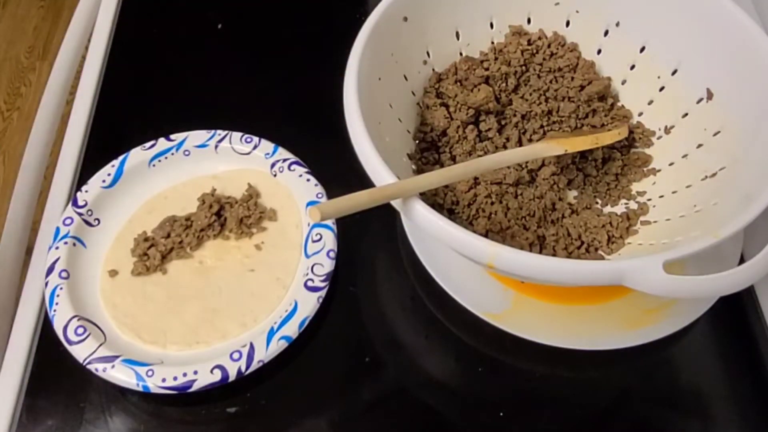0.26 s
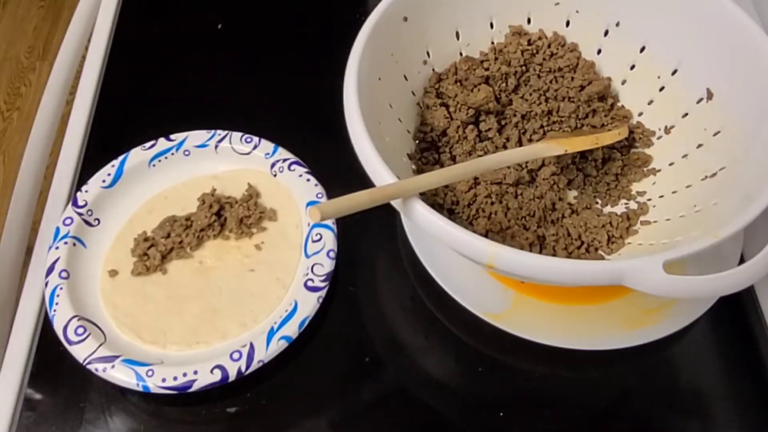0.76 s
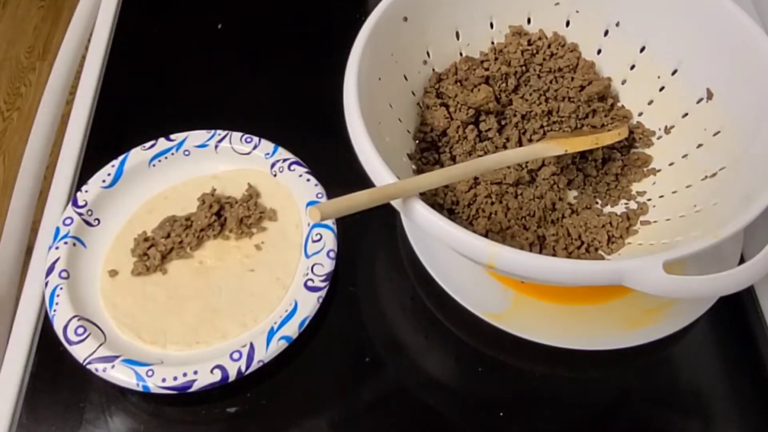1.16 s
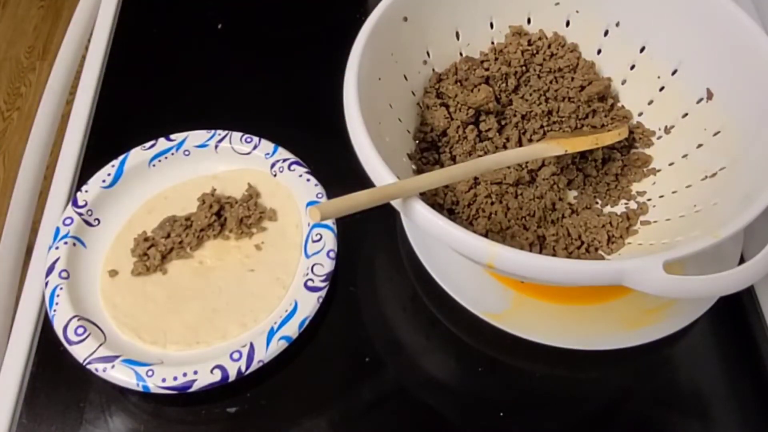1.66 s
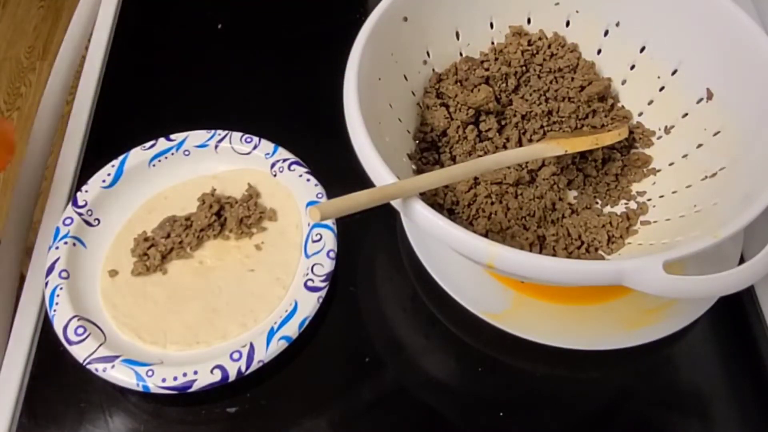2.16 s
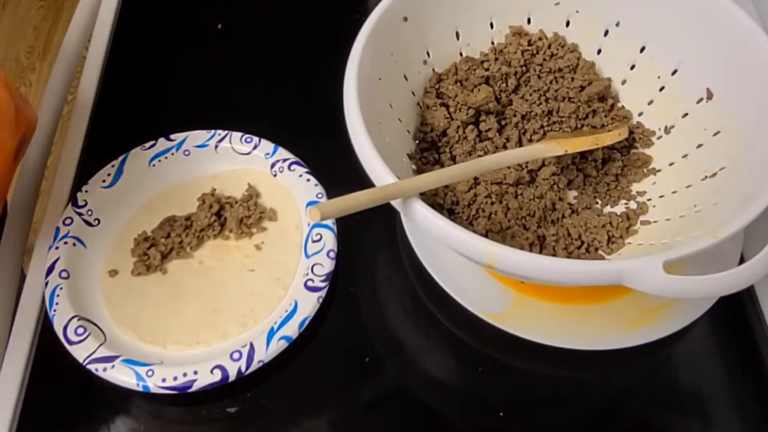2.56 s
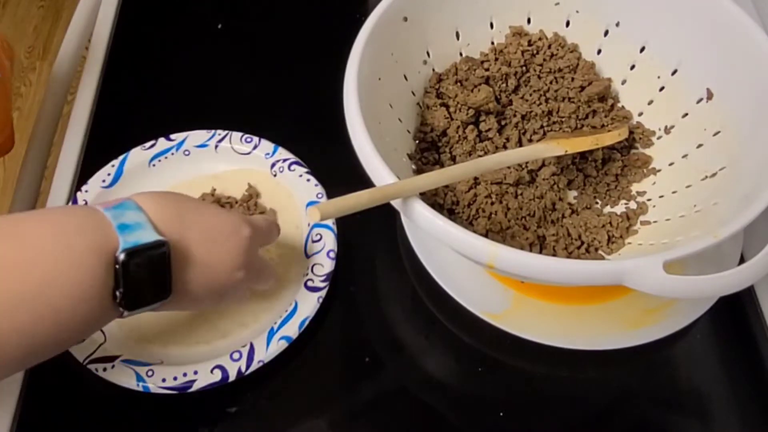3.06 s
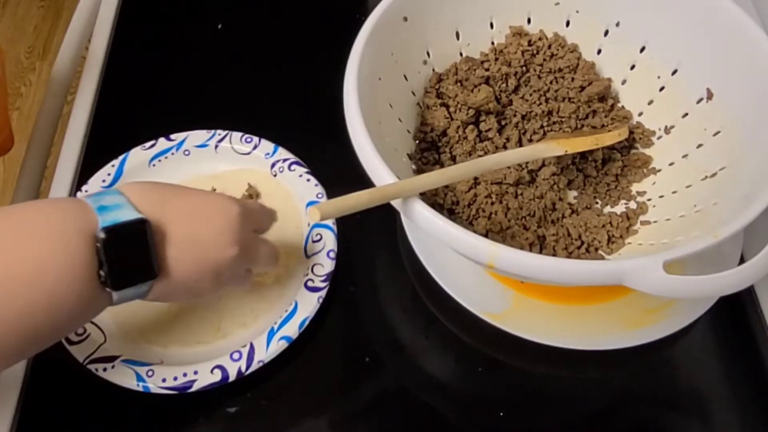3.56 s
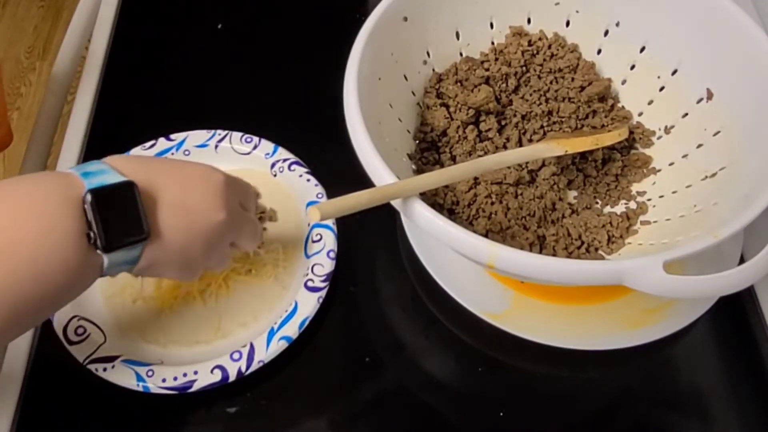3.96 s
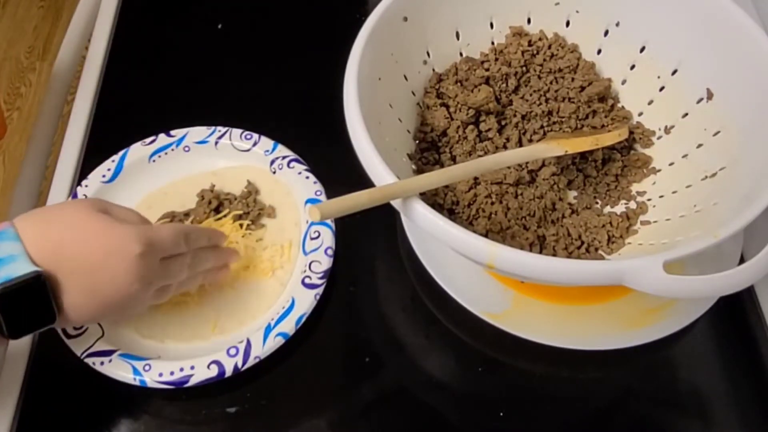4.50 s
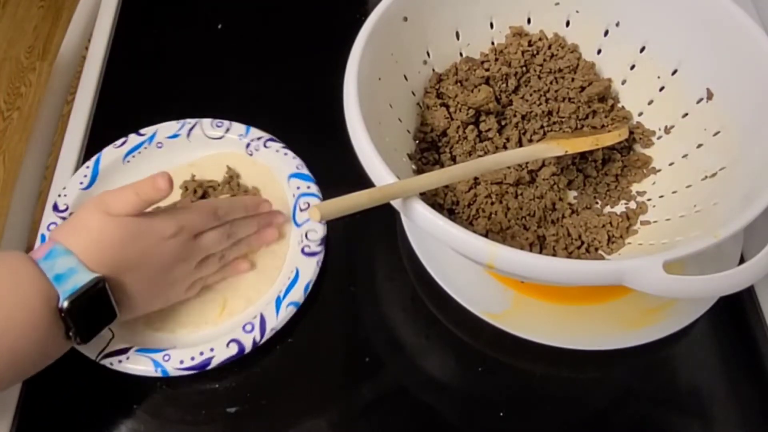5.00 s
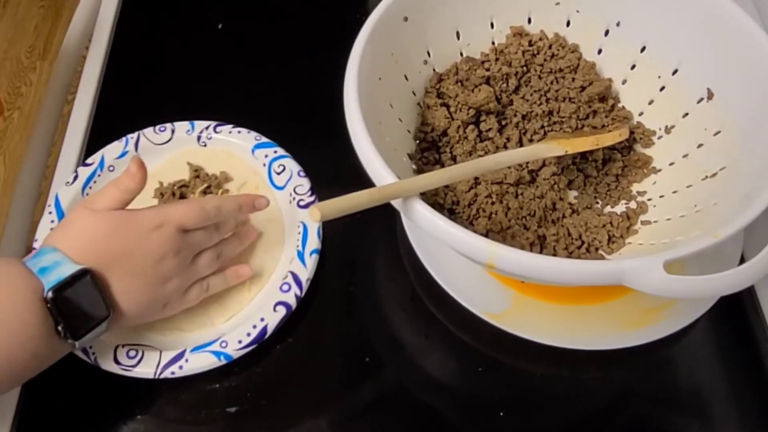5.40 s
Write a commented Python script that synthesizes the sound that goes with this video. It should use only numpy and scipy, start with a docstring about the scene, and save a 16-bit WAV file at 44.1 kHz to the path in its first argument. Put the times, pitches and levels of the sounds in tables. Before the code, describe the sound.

Crisp, irregular plastic crinkles fill the first two and a half seconds, with a light knock buried among them. Then come dull papery finger taps, a stretch of near silence, a quick light rattle of something hard, and finally a heavy low thump with dry scuffing. Recorded close in stereo in a dry, quiet kitchen with low room hum; bag sounds lean left.

```python
"""A hand in a bag of cheese

A quiet kitchen: on the left a hand rummages in a plastic bag of shredded cheese. Its creases snap and rustle as bursts
of short noise clicks. Soft thumps and one firm knock shake the counter, fingers touch a paper plate, and a small hard
thing rattles briefly: these are blows that ring fading sines. Filtered noise gives the room hum and a hiss.
Two microphone ports hear it, the left side first."""
import sys
import numpy as np
from scipy import signal
from scipy.fft import rfft, irfft, next_fast_len
from scipy.io import wavfile
from scipy.ndimage import uniform_filter1d

SR = 44100
rng = np.random.default_rng(int(sys.argv[2]) if len(sys.argv) > 2 else 0)


def unload_wav(signal):
    """Save mono or channel-first audio to the path in sys.argv[1] as 16-bit WAV at rate SR, clipped to [-1, 1]."""
    wavfile.write(
        sys.argv[1],
        SR,
        np.round(np.clip(np.atleast_2d(signal).T, -1, 1) * 32767).astype(np.int16),
    )


N = 248724

# colour of the room hum: pitch_hz, level_db (per Hz, relative)
ROOM_COLOUR = [(29, -49), (50, -23), (91, -23), (148, 1), (264, -28.5), (398, -18.5), (842, -9.5),
               (1300, -14), (1540, -19.5), (1960, -18), (2810, -16), (3580, -13.5), (10100, -18),
               (12300, -11), (16000, -17.5)]
ROOM_DB = -49.5
# a treble hiss that stops, then creeps back faintly: start_s, level_db
HISS_LEVEL = [(0, -53.5), (2.4, -56), (3.0, -52), (3.45, -56), (3.55, -79), (5.64, -62)]
# colour of the hiss: pitch_hz, level_db (per Hz, relative)
HISS_COLOUR = [(2500, -19.5), (4500, -18), (8000, -21.5), (12400, -13), (16000, -22)]
ROOM_PATCHY_DB, HISS_PATCHY_DB = 2.2, 3
# how alike the room sounds at left and right: pitch_hz, likeness (0 to 1)
ROOM_LIKENESS = [(60, 0.97), (200, 1), (400, 0.71), (800, 1), (2000, 0.59), (5000, 0.016), (15000, 0.0089)]
# how fast the echo dies by 60 dB: pitch_hz, fade_s
REVERB_FADE = [(200, 0.23), (1000, 0.17), (4000, 0.17), (15000, 0.048)]

# thumps and the knock on the counter: start_s, blow_db, contact_hz, share (ring time over each note's own fade)
THUMPS = [(1.16, -53.5, 197, 0.53), (1.695, -53, 210, 0.45), (1.8195, -32, 540, 0.38),
          (1.832, -41, 185, 0.3), (1.8395, -35.5, 476, 0.45), (1.845, -35, 600, 0.3),
          (1.848, -34.5, 201, 0.14), (1.852, -45, 50, 0.99), (1.868, -49, 200, 0.56),
          (2.91, -51, 201, 0.36), (2.968, -52, 190, 0.27), (3.025, -49.5, 170, 0.34),
          (5.3255, -23.5, 770, 0.84), (5.3255, -29.5, 318, 0.89), (5.3239, -12.3, 58, 1.07),
          (5.3361, -12.5, 71.6, 0.47), (5.343, -37, 605, 1.2), (5.356, -29.5, 470, 0.77),
          (5.392, -47, 125, 0.59)]
# notes the counter can ring: pitch_hz, level_db, fade_s (by 60 dB)
COUNTER_MODES = [(50, -27, 1.0), (67.3, -33, 0.98), (61.3, 9, 0.11), (96.3, 22.5, 0.049), (128, 7, 0.32),
                 (144, 12.5, 0.18), (188.6, 8, 0.076), (221, 8, 0.14), (275, 13, 0.047),
                 (309.5, 1.5, 0.083), (387, -6, 0.11), (427, 2, 0.035), (485, 3, 0.046), (555, -0.5, 0.065),
                 (615, 1.5, 0.03), (742, -10, 0.064), (797, 7.5, 0.029), (901, -11.5, 0.16),
                 (966, -11, 0.051), (1130, -2, 0.018), (1430, 1, 0.039), (1860, 10, 0.026),
                 (2400, 17, 0.055)]
# fingers on the paper plate: start_s, blow_db, contact_hz, share (ring time over each note's own fade)
TOUCHES = [(2.888, -42.5, 670, 0.92), (2.9, -44.5, 700, 0.92), (2.937, -52, 800, 0.64),
           (2.97, -42.5, 740, 0.8), (3.011, -51, 1850, 0.89), (3.02, -36.5, 1010, 0.6),
           (3.033, -43, 700, 0.94), (3.044, -35.5, 1000, 0.58), (3.046, -49, 1900, 0.74),
           (3.054, -42, 930, 0.67), (3.068, -46, 960, 0.8), (3.091, -52, 840, 1.3), (3.16, -52, 804, 0.7)]
# notes the plate can ring: pitch_hz, level_db, fade_s (by 60 dB)
PLATE_MODES = [(640, -1.5, 0.046), (700, 3.5, 0.048), (808, -2, 0.06), (930, 1.5, 0.047), (1010, 3, 0.046),
               (1200, -3, 0.028), (1540, 4, 0.04), (1850, 1, 0.054), (2150, 5, 0.034)]
# blows of the rattle: start_s, blow_db, contact_hz, share (ring time over each note's own fade)
RATTLE_BLOWS = [(4.3635, -35, 910, 0.53), (4.367, -36.5, 950, 0.7), (4.365, -42, 4300, 0.58),
                (4.438, -41.5, 1160, 0.61), (4.440, -48, 2500, 0.59), (4.492, -39, 1340, 1.1),
                (4.534, -44.5, 1200, 0.88), (4.534, -49, 2940, 0.9), (4.539, -45, 9700, 1),
                (4.572, -64, 850, 1.2)]
# notes the rattling thing can ring: pitch_hz, level_db, fade_s (by 60 dB)
RATTLE_MODES = [(803, 2, 0.038), (1002, 5, 0.063), (1240, 5, 0.026), (1480, 4.5, 0.047), (1588, 2.5, 0.11),
                (2500, 10.5, 0.045), (3880, 8.5, 0.041), (4740, -1, 0.039), (9600, 9, 0.038)]
CHATTER_CYCLES = 10  # small re-touches follow a ragged contact, 20 dB weaker after so many cycles of its colour
DETUNE = .01  # each lighter blow lands elsewhere and shifts the notes by about this share
CHATTER_FROM_HZ = 330  # heavy blows, duller than this, land whole

# colour of the film, and of its fuller folds: pitch_hz, level_db (per Hz, relative)
FILM = [(60, -45), (200, -8), (500, -7.5), (1000, -5), (2300, 2), (3000, -3), (4000, -2.5), (7000, -2),
        (10000, -4), (13000, -2.5), (15000, -1.5)]
FILM_BODY = [(200, -81), (500, -13.5), (1000, 7.5), (1600, -3.5), (2400, 6), (4000, -2.5), (8000, -12.5)]
# how alike the creases sound at left and right: pitch_hz, likeness (0 to 1)
BAG_LIKENESS = [(300, .95), (800, .8), (2000, .5), (5000, .4), (15000, .4)]
# strength of the rummaging: start_s, level_db
RUMMAGING = [(0.0, -57), (0.3, -54), (0.4, -48.5), (0.68, -55), (1.11, -45), (1.13, -35.5), (1.17, -43),
             (1.23, -46.5), (1.36, -48.5), (1.55, -44), (1.7, -49), (1.95, -43.5), (2.06, -47.5),
             (2.12, -47), (2.25, -51), (2.4, -49.5), (2.7, -59.5)]
AFTER_DB, AFTER_S = -22.5, 0.061  # each snap stirs the film, which settles by 60 dB in this time
# longer scuffs with the last rattle blows and round the knock: start_s, peak_db, colour_hz, body_db (relative)
SCUFFS = [(4.5311, -25.5, 10100, -4), (4.572, -29, 12600, -12), (5.2835, -28.5, 2390, -28),
          (5.284, -33, 3670, -15), (5.2845, -45, 5100, -20), (5.331, -28, 3900, 1),
          (5.362, -30.5, 1850, -3), (5.4002, -27, 7550, -6), (5.401, -31, 3860, -22),
          (5.418, -32, 6500, -31), (5.419, -26.5, 3770, -23), (5.44, -38, 6500, -25),
          (5.459, -27, 4250, -34), (5.461, -30, 7400, -30)]
SCUFF_DYING_S, SCUFF_FLIP_DB, SCUFF_COLOUR_DB = 0.096, -6, 10
# single creases that crack sharply: start_s, peak_db, colour_hz
CRACKS = [(0.161, -21, 8900), (0.332, -33, 8900), (0.703, -31, 8000), (0.7259, -13.5, 7800),
          (1.1293, -11.5, 7000), (1.131, -17, 6030), (1.1386, -18, 6800), (1.156, -19, 5100),
          (1.1672, -15, 12500), (1.1726, -16, 6800), (1.4262, -25, 5000), (1.466, -8.5, 12600),
          (1.494, -13, 7700), (1.5, -32, 7400), (1.5325, -21, 7000), (1.63, -24, 6140), (1.726, -24, 12500),
          (1.797, -20, 12000), (1.7636, -27, 5100), (1.873, -27, 12500), (1.899, -29, 6000),
          (1.992, -22, 9200), (2.0004, -15, 9100), (2.0155, -27, 9000), (2.087, -20, 7800),
          (2.096, -16, 7800), (2.132, -26, 7950), (2.297, -24, 11000), (4.3639, -26, 11600)]
# clear snaps of the bag, and crisp clicks of the rattle and knock: start_s, peak_db, colour_hz, body_db (relative)
SNAPS = [(0.0074, -28, 12100, -13), (0.103, -34.5, 3800, 3), (0.13, -26, 3670, -9), (0.16, -23, 1850, -9),
         (0.232, -28.5, 3700, -5), (0.28, -34.5, 3970, 3), (0.331, -26, 8900, -3), (0.337, -24, 3880, -8),
         (0.3547, -22.5, 13900, -25), (0.401, -27, 12200, -25), (0.418, -24.5, 12400, -35),
         (0.558, -22, 13000, -10), (0.7038, -21, 8040, -31), (0.714, -35, 7900, -27),
         (0.7232, -17.5, 7800, -37), (0.734, -18, 7500, -35), (0.7568, -24.5, 11600, -11),
         (0.792, -28.5, 3870, -17), (0.873, -30.5, 7350, -7), (0.9069, -23.5, 12000, -2.5),
         (0.977, -29.5, 3960, -25), (1.0273, -22.5, 3800, -25), (1.044, -26.5, 5190, -23),
         (1.084, -32, 3550, -2), (1.122, -25, 7000, -14), (1.1268, -15, 7000, -4),
         (1.136, -15.5, 6800, -10), (1.142, -18.5, 2210, -1), (1.148, -15.5, 7160, -2.5),
         (1.153, -9.5, 12300, -13), (1.157, -13.5, 5100, -13), (1.1642, -16, 3740, -10),
         (1.1702, -17, 6240, -1), (1.175, -20, 1910, -4), (1.181, -18, 2550, -10),
         (1.252, -20.5, 6030, -2.5), (1.272, -23, 4040, -34), (1.2836, -18, 3450, -27),
         (1.301, -19, 7600, -15), (1.4249, -24, 3880, -6.5), (1.4658, -22, 6500, -13),
         (1.4813, -37, 4300, -15), (1.491, -16, 7800, -2), (1.498, -23, 7300, -1), (1.532, -20, 5200, -7),
         (1.5437, -20, 5660, -10), (1.5641, -27.5, 2170, -15), (1.616, -29.5, 2400, 2.5),
         (1.637, -20.5, 6950, -9), (1.657, -25.5, 12400, 1), (1.6619, -14.5, 13700, -13),
         (1.666, -35, 13000, -13), (1.673, -22.5, 9000, -9), (1.693, -30.5, 2150, 7.5),
         (1.7034, -20, 2470, -2), (1.726, -20, 13000, -9), (1.7607, -25, 5060, -3), (1.781, -30, 6050, -2),
         (1.7953, -30, 12000, -5), (1.8715, -29.5, 6000, -9), (1.8957, -29, 5860, -15),
         (1.978, -30.5, 6460, 6), (1.9995, -18, 9600, -8), (2.0124, -26, 8000, 1.5),
         (2.086, -22, 7940, -31), (2.095, -20.5, 7900, -9), (2.154, -26.5, 6330, 1),
         (2.1817, -24.5, 12700, -17), (2.2129, -34, 5580, 4), (2.243, -22.5, 1650, 1),
         (2.291, -31, 5970, -22), (2.346, -31, 3200, 5), (4.363, -16, 11400, -32),
         (4.4368, -26.5, 4460, 0.5), (5.323, -20.5, 5930, 6.5), (5.356, -25.5, 3900, 4.5)]
SNAP_DYING_S = 0.024  # time in which a snap fades by 60 dB
SNAP_FLIP_DB = -2  # its first flip, compared with the rest
SNAP_COLOUR_DB = 6  # how far its colour stands out
SMALL_COUNT = 70  # small snaps at random moments
SMALL_DB, SMALL_SPREAD_DB = 11, 4  # their peak over the rummaging level, and its spread each way
SMALL_BODY_DB = -18
GRAIN_SPREAD_DB = 6.5  # how unequal the creases within a snap are
GATHER_S = 0.004  # the smaller creases build up at this pace
FLIP_S = .00006  # width of one flip

# loudness difference of the two ports: pitch_hz, left_minus_right_db
PORTS = [(60, 0.5), (150, 0.0), (380, 3.0), (950, 0.5), (2380, 1.0), (5980, 3.5), (15000, 3.5)]
LAG = 8  # samples by which the right port hears later
EDGE_HZ = 15450  # upper limit of the sound


def gain_of(db):
    """Turns dB into a factor."""
    return 10 ** (np.asarray(db) / 20)


def evened(x):
    """Scales a sound to an average strength (rms) of 1."""
    return x / np.sqrt(np.mean(x ** 2) + 1e-20)


def read(points, hz):
    """Reads a pitch table between its points, on a log pitch axis."""
    f, value = np.transpose(points)
    return np.interp(np.log(hz + 1), np.log(f + 1), value)


def curve(rows):
    """Draws each column of a time table as a line over all samples."""
    s, *columns = np.transpose(rows)
    return [np.interp(np.arange(N) / SR, s, c) for c in columns]


def add(mix, s, sound):
    """Mixes a sound in at s seconds."""
    part = mix[round(s * SR):][:len(sound)]
    part += sound[:len(part)]


def coloured(x, shape_db):
    """Filters x by a function that gives dB for each Hz."""
    size = next_fast_len(x.shape[-1] + 256)
    gain = gain_of(shape_db(np.fft.rfftfreq(size, 1 / SR)))
    return irfft(rfft(x, size) * gain, size)[..., :x.shape[-1]]


def bump(hz, centre_hz, octaves):
    """A bell of height 1 around a pitch."""
    return np.exp(-.5 * (np.log2((hz + 1) / centre_hz) / octaves) ** 2)


def partly_alike(first, second, hz):
    """Blends two spectra into a left and right pair that is as alike as the room."""
    same = np.clip(read(ROOM_LIKENESS, hz), 0, 1)[:, None]
    return np.array([first, same * first + np.sqrt(1 - same ** 2) * second])


def steady(colour, patchy_db):
    """Random short-time spectra with drifting patches, partly alike at both ports."""
    frames, hz = N // 512 + 5, np.fft.rfftfreq(2048, 1 / SR)
    a, b, c, d, patches = rng.standard_normal((frames, 1025, 5)).T
    patches = uniform_filter1d(patches, 8, 0)  # smooth over pitch
    patches = evened(uniform_filter1d(patches, 5, 1))  # smooth over time
    z = partly_alike(a + 1j * b, c + 1j * d, hz)
    z *= gain_of(read(colour, hz)[:, None] + patchy_db * patches)
    return evened(signal.istft(z, nperseg=2048, noverlap=1536)[1][:, :N])


def room_hum():
    """Steady noise, shaped to the colour of the room."""
    return gain_of(ROOM_DB) * steady(ROOM_COLOUR, ROOM_PATCHY_DB)


def hiss():
    """Treble noise whose strength follows its level table."""
    return gain_of(curve(HISS_LEVEL)[0]) * steady(HISS_COLOUR, HISS_PATCHY_DB)


def reverb(x, fade):
    """Room echo: sparse clicks of random sign, each pitch band dying at its own speed, partly alike at both ports."""
    taps = np.zeros((2, SR // 2))
    at = np.arange(20, SR // 2 - 20, 20) + rng.integers(0, 20, (2, (SR // 2 - 21) // 20))
    np.put_along_axis(taps, at, rng.choice([-1., 1.], at.shape), 1)
    hz, t, z = signal.stft(taps, SR, nperseg=128)
    z = partly_alike(z[0], z[1], hz)
    tail = signal.istft(z * gain_of(-60 * t / read(fade, hz)[:, None]), SR, nperseg=128)[1]
    return signal.fftconvolve(x[None], tail / np.linalg.norm(tail[0]), axes=1)[:, :N]


def struck(blows, modes, octaves, cycles, chatter_db):
    """Each blow rings the notes near the colour of its contact; a duller contact builds up more slowly."""
    out, t = np.zeros(N), np.arange(SR // 3) / SR
    own_hz, mode_db, fade_s = np.transpose(modes)[..., None]
    for s, db, contact_hz, share in blows:
        light = contact_hz > CHATTER_FROM_HZ
        hz = own_hz * (1 + light * DETUNE * rng.standard_normal(own_hz.shape))
        rings = -gain_of(mode_db - 60 * t / (fade_s * share)) * np.sin(2 * np.pi * hz * t)
        build_up = 1 - np.exp(-t * contact_hz / cycles)
        ring = build_up * (bump(hz, contact_hz, octaves) * rings).sum(0)
        touches = rng.standard_normal(4000) * (rng.random(4000) < contact_hz / SR)
        touches *= gain_of(-20 * t[:4000] * contact_hz / CHATTER_CYCLES)
        chatter = signal.fftconvolve(ring, touches)[:len(t)]
        add(out, s, gain_of(db) * (ring + light * gain_of(chatter_db) * chatter))
    return out


def counter_thumps():
    """Soft thumps and a firm knock ring the counter; many are damped short, some ring longer."""
    return -struck(THUMPS, COUNTER_MODES, .55, 1.5, -14)


def plate_touches():
    """Fingers tap the paper plate, which rings very briefly."""
    return struck(TOUCHES, PLATE_MODES, .32, 1.5, -13)


def rattle():
    """A small hard thing is hit several times and rings its own notes."""
    return struck(RATTLE_BLOWS, RATTLE_MODES, 0.42, 1.0, -21)


def both_ports(a, b):
    """Left hears a; right hears a blend of a and b that is less alike in the treble."""
    same = lambda f: np.clip(read(BAG_LIKENESS, f), .01, .999)
    shared = coloured(a, lambda f: 20 * np.log10(same(f)))
    own = coloured(b, lambda f: 10 * np.log10(1 - same(f) ** 2))
    return np.array([a, shared + own])


def rustle(per_s=1300, spread_db=5.0):
    """Many tiny creases, each in one of several colours of the film; they follow the hand and swell after each snap."""
    level = gain_of(curve(RUMMAGING)[0]) * (np.arange(N) < RUMMAGING[-1][0] * SR)
    power, settling = level ** 2, gain_of(-120 * np.arange(SR // 4) / SR / AFTER_S)
    for s, db, *_ in SNAPS:
        add(power, s, gain_of(2 * (db + AFTER_DB)) * settling)
    size = gain_of(spread_db * np.minimum(rng.exponential(1, N), 4))
    size *= rng.random(N) < per_s / SR  # most samples start no crease
    size *= rng.choice([-1, 1], N)
    kind, t = rng.integers(0, 14, N), np.arange(300) / SR
    out = np.zeros((2, N))
    for k, hz in enumerate(np.geomspace(1200, 14000, 14)):
        noise = rng.standard_normal((2, len(t))) * gain_of(-60 * t / 0.007)
        crease = coloured(noise, lambda f: 8 * bump(f, hz, 0.023))
        crease /= np.linalg.norm(crease)
        out += signal.oaconvolve(size[None] * (kind == k), crease, axes=1)[:, :N]
    film = evened(coloured(out, lambda f: read(FILM, f)))
    return both_ports(*film * np.sqrt(power))


def flip(db, hz):
    """One crease turning over within a few samples: a very short noise click, centred 1.5 ms in."""
    t = np.arange(400) / SR
    click = rng.standard_normal(len(t)) * np.exp(-((t - .0015) / FLIP_S) ** 2)
    colour = lambda f: read(FILM, f) + 6 * bump(f, hz, 0.3) - 16 * bump(f, 300, 2.2) - 60 * (f > EDGE_HZ)
    click = coloured(click, colour)
    return gain_of(db) * click / abs(click).max()


def cracks():
    """Sharp single flips, heard alike at both ports."""
    out = np.zeros(N)
    for s, db, hz in CRACKS:
        add(out, s - .0015, flip(db, hz))
    return out


def small_snaps():
    """Rows like those of the clear snaps, at random moments and colours, following the strength of the rummaging."""
    when, size, colour = rng.random((SMALL_COUNT, 3)).T
    s = (np.arange(SMALL_COUNT) + when) / SMALL_COUNT * 2.3  # spread over 2.3 s
    db = np.interp(s, *np.transpose(RUMMAGING)) + SMALL_DB + SMALL_SPREAD_DB * (2 * size - 1)
    return list(zip(s, db, 2000 * 6.5 ** colour, np.full(SMALL_COUNT, SMALL_BODY_DB)))


def snaps(rows, dying_s, flip_db, colour_db):
    """A crease flips at once, a wide click; smaller creases all over the bag gather round it and die away."""
    flips, a, b, t = np.zeros(N), np.zeros(N), np.zeros(N), np.arange(2800) / SR
    for s, db, hz, body_db in rows:
        spread = np.minimum(rng.exponential(1, len(t)), 4)
        grains = rng.standard_normal((4, len(t))) * gain_of(GRAIN_SPREAD_DB * spread)
        burst = grains * (1 - np.exp(-t / GATHER_S)) * gain_of(-60 * t / dying_s)
        # large creases sound low and lose treble above their colour
        treble_loss = lambda f: 6.74 * np.maximum(np.log2((f + 1) / hz), 0)
        colour = lambda f: read(FILM, f) - treble_loss(f) - 12 * bump(f, 450, 1.48)
        crisp = coloured(burst[:2], lambda f: colour(f) + colour_db * bump(f, hz, 0.2))
        body = coloured(burst[2:4], lambda f: read(FILM_BODY, f))
        creases = gain_of(db) * (crisp / abs(crisp).max() + gain_of(body_db) * body / abs(body).max())
        add(a, s, creases[0])
        add(b, s, creases[1])
        add(flips, s, flip(db + flip_db, hz))
    return flips + both_ports(a, b)


def scuffs():
    """Longer-lasting bursts of creases, made like the snaps."""
    return snaps(SCUFFS, SCUFF_DYING_S, SCUFF_FLIP_DB, SCUFF_COLOUR_DB)


def bag():
    """Clear and small snaps, sharp cracks and the rustle between them."""
    clicks = snaps(SNAPS + small_snaps(), SNAP_DYING_S, SNAP_FLIP_DB, SNAP_COLOUR_DB)
    return clicks + cracks() + rustle()


def scene():
    """All sources and the room; all but the counter and plate reach the right port later."""
    floor = room_hum() + hiss()
    counter = counter_thumps() + plate_touches()
    near = bag() + scuffs() + rattle()
    to_echo = gain_of(-5.0) * near[0] + gain_of(-11) * counter
    left, right = near + reverb(to_echo, REVERB_FADE) + floor
    late_right = np.r_[np.zeros(LAG), right[:-LAG]]
    return np.array([left, late_right]) + counter


def record(dry):
    """The right port is duller; both drop the deepest bass and the top treble."""
    left = coloured(dry[0], lambda f: read(PORTS, f) / 2)
    right = coloured(dry[1], lambda f: -read(PORTS, f) / 2)
    both = signal.sosfilt(signal.butter(4, 48, "high", fs=SR, output="sos"), [left, right])
    treble_limit = signal.firwin(255, EDGE_HZ, window=("kaiser", 9), fs=SR)
    return signal.oaconvolve(both, treble_limit[None], "same")


dry = scene()
out = record(dry)
unload_wav(out)
```